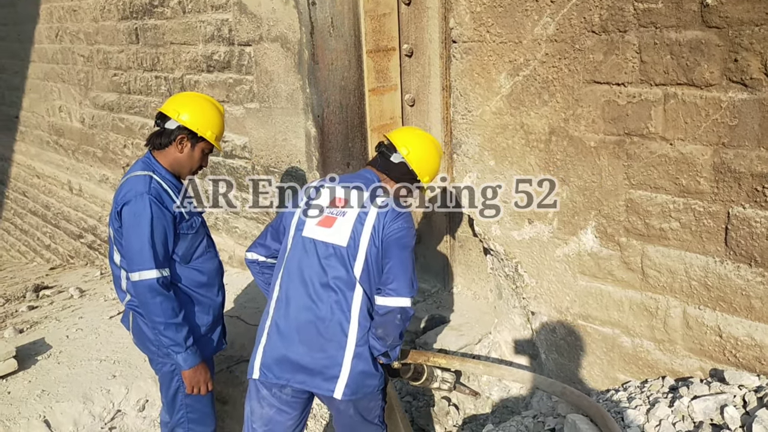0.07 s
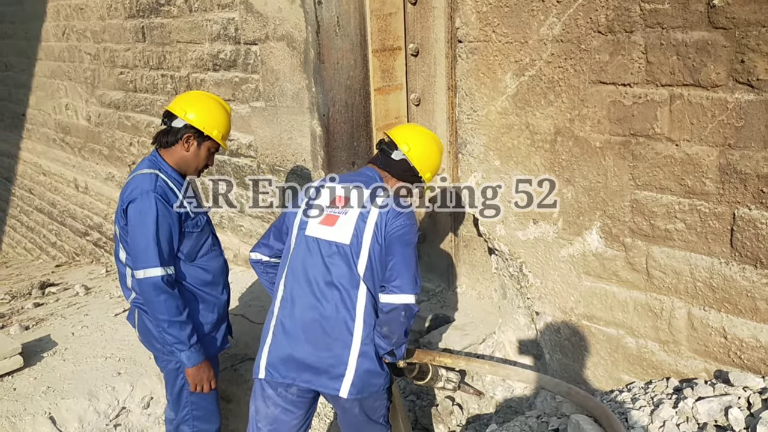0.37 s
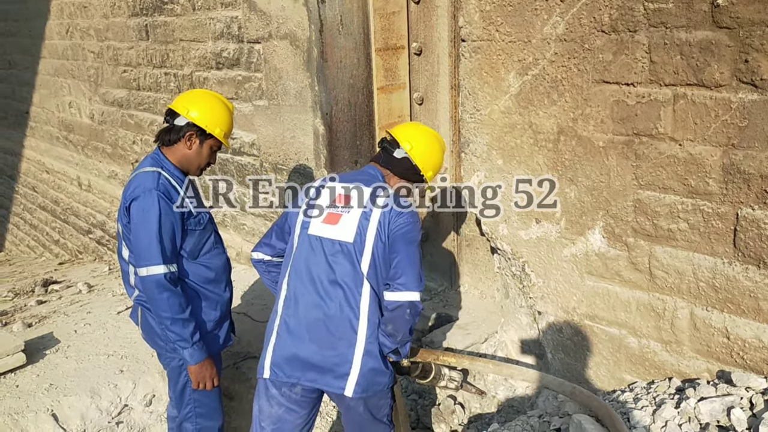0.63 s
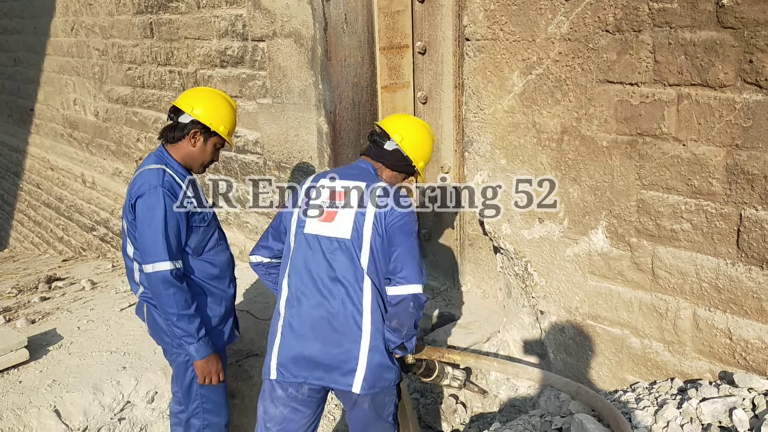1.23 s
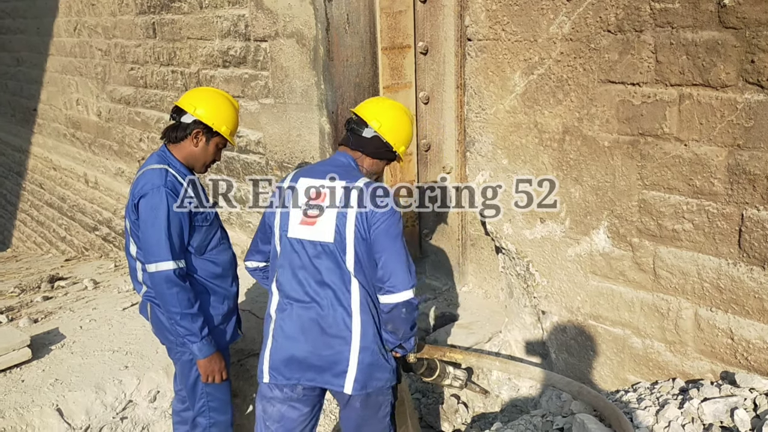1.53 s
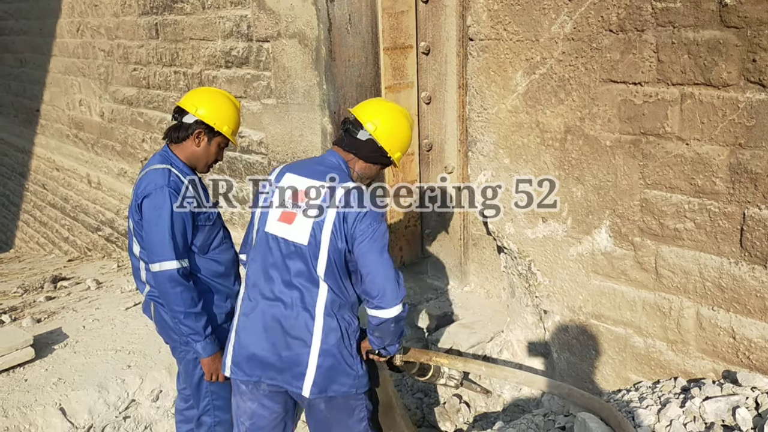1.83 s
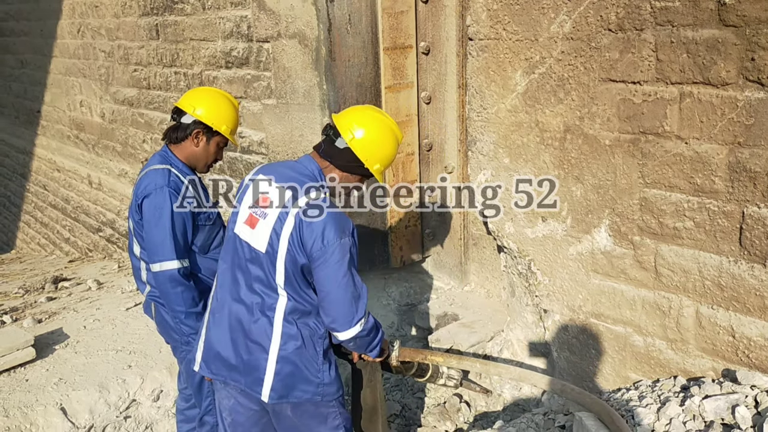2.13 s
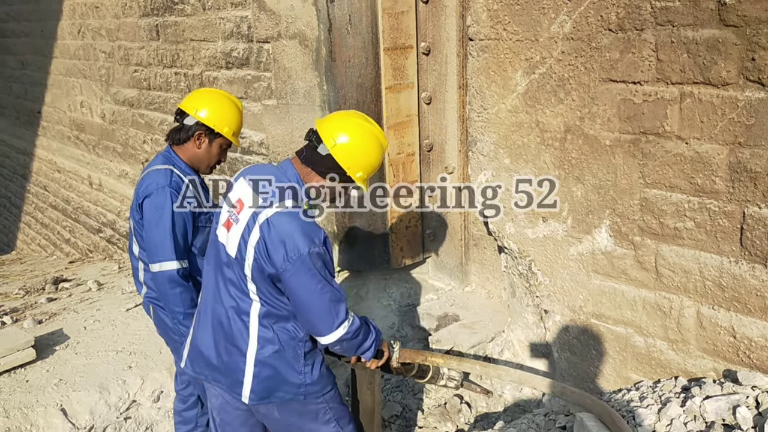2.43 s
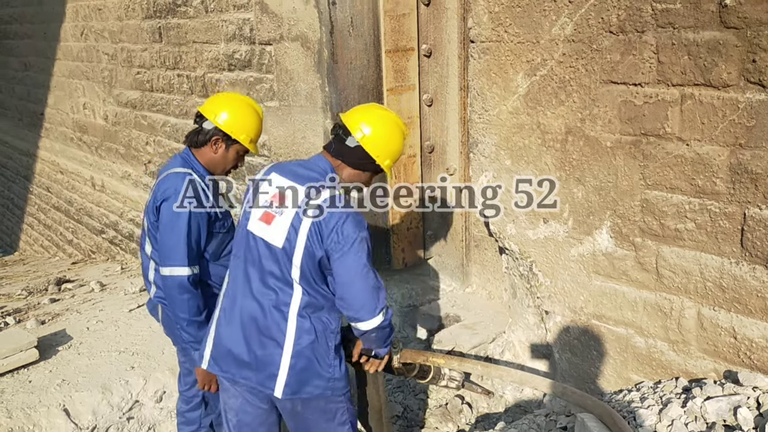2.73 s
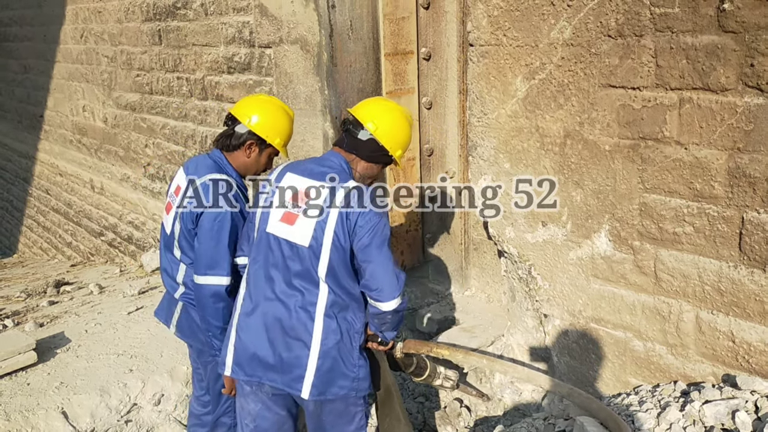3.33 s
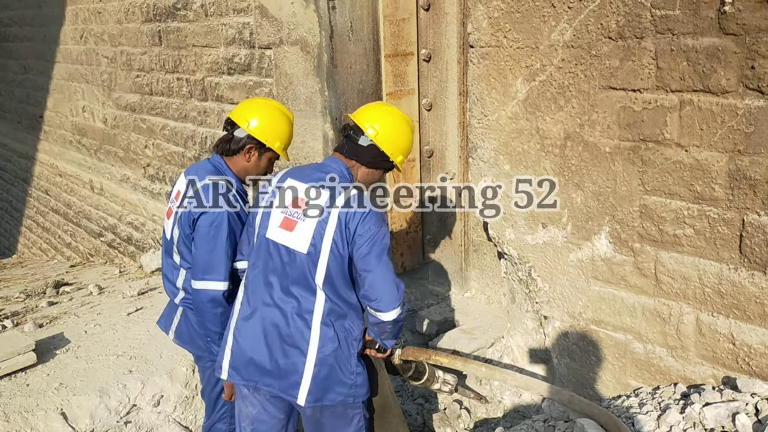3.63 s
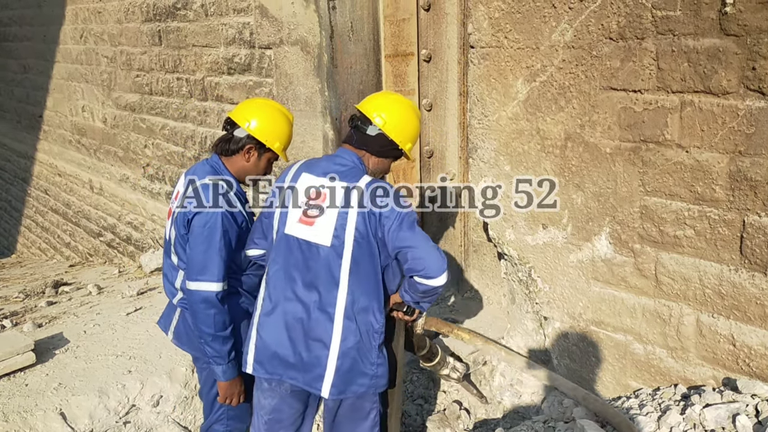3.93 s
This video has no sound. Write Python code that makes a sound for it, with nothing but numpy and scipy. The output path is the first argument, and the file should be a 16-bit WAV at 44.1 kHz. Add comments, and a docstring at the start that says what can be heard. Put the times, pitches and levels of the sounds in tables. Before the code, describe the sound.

A pneumatic hammer pounds concrete rapidly from the start until about 1.7 seconds, each stroke a steel tick, a knock and a puff of air. Compressed air then rushes steadily with a whirring rattle and low throb. At 2.9 seconds a short, faster burst of blows cuts in, and the air resumes from 3.3 seconds to the end. Faint leaking air and outdoor site noise run underneath.

```python
"""A pneumatic hammer pounds concrete outdoors, a few metres away in front of a stone wall.
Each stroke is a steel tick, a knock in the concrete and a puff of exhaust air.
After each of the two bursts the air rushes steadily, with a whirring machine rattle and a low throb.
Underneath run leaking air, site noise, slow gusts and faint, very low thumps from the recorder."""
import sys
import numpy as np
from scipy import signal
from scipy.fft import rfft, irfft
from scipy.io import wavfile
from scipy.ndimage import uniform_filter1d

SR = 44100
rng = np.random.default_rng(int(sys.argv[2]) if len(sys.argv) > 2 else 0)


def transcribe(signal):
    """Save signal, clipped to [-1, 1], as a 16-bit WAV file at the path in sys.argv[1]."""
    frames = np.atleast_2d(signal).T
    limited = np.clip(frames, -1, 1)
    pcm = np.round(limited * 32767).astype(np.int16)
    wavfile.write(sys.argv[1], SR, pcm)


N = 176400

# spells of rushing air: start_s, end_s, level_db, whirr_swell_s
AIR_SPELLS = [(1.729, 2.894, -41.5, 0.077), (3.33, 4.1, -41.5, .022)]


def undb(db):
    return 10 ** (np.asarray(db) / 20)


def unit_rms(x):
    return x / np.sqrt(np.mean(x ** 2))


def colour(x, spectrum):
    """Filter by points of freq_hz, gain_db; rms 1."""
    hz, db = np.array(spectrum, float).T
    bins_hz = np.maximum(np.arange(N // 2 + 1) * SR / N, 1)
    gain = undb(np.interp(np.log(bins_hz), np.log(hz), db))
    return unit_rms(irfft(rfft(x) * gain, N))


def noise(spectrum):
    return colour(rng.standard_normal(N), spectrum)


def drift(rate_hz):
    """Smooth random drift; rms 1."""
    step = int(SR / rate_hz)
    stairs = np.repeat(rng.standard_normal(N // step + 1), step)
    return unit_rms(uniform_filter1d(uniform_filter1d(stairs, step), step)[:N])


def pulses(starts_s, levels_db, rise_s, hold_s, decay_s):
    """Sum of rise-hold-decay envelopes."""
    t = np.arange(SR // 4) / SR
    shape = np.minimum(t / rise_s, 1) * np.exp(-np.maximum(t - rise_s - hold_s, 0) / decay_s)
    impulses = np.zeros(N)
    impulses[np.clip((starts_s * SR).astype(int), 0, N - 1)] = undb(levels_db)
    return signal.fftconvolve(impulses, shape)[:N]


def add(out, start_s, x):
    i = int(max(start_s, 0) * SR)
    out[i:i + len(x)] += x[:max(N - i, 0)]


def ring(modes, length_s, t60_scale=1):
    """Struck modes decay; every blow detunes them slightly."""
    t = np.arange(int(length_s * SR)) / SR
    return sum(undb(db) * np.sin(2 * np.pi * hz * (1 + 0.0021 * rng.standard_normal()) * t)
               * np.exp(-np.log(1000) * t / (t60_s * t60_scale)) for hz, db, t60_s in modes)


def hammer():
    """Air drives the piston onto steel, the tip knocks and cracks concrete, the cylinder exhausts."""
    # start_s, tick_db, knock_db, puff_db
    strokes = [(0.001, -44, -42.5, -42.6), (0.0586, -40, -40, -43.5), (0.1184, -37, -45.5, -43.4),
               (0.18, -40.5, -41.2, -43.5), (0.2414, -38.6, -41, -44), (0.3025, -38.3, -42, -41.5),
               (0.3638, -39.5, -44, -48), (0.4248, -41, -44, -48), (0.4838, -39.5, -43.5, -47),
               (0.5436, -40, -40.5, -45), (0.6019, -39, -42, -46), (0.6623, -40, -43.5, -44.5),
               (0.7214, -40.1, -43.5, -48), (0.7806, -39.5, -43, -41.5), (0.84, -37.5, -39.5, -42),
               (0.9003, -40, -41.5, -46.5), (0.9588, -42, -41.5, -44.5), (1.0179, -40, -46.5, -48),
               (1.0788, -40.2, -43, -51), (1.1364, -40, -41.5, -46), (1.1951, -36.5, -39, -41.2),
               (1.2533, -41, -39.5, -42), (1.3149, -37, -42, -40.5), (1.3732, -37.5, -41, -44),
               (1.4342, -37, -42.1, -42), (1.4963, -37.5, -41.5, -41), (1.5592, -39, -44.5, -70),
               (1.5976, -38, -43.5, -62), (1.653, -41.5, -40.5, -60), (1.776, -49, -39, -56),
               (2.902, -39, -43, -66), (2.9426, -39.5, -44, -45), (3.008, -36, -42.7, -64),
               (3.0431, -38.5, -46.5, -78), (3.0769, -37.5, -46, -67), (3.1132, -38, -47, -78),
               (3.1477, -39.4, -42.5, -66), (3.1846, -39.6, -43.5, -70), (3.2239, -40.5, -44, -67)]
    # noise spectra: freq_hz, gain_db
    tick_spectrum = [(500, -18), (2500, -4.5), (4300, -13), (6000, -13), (7200, -8.5), (9300, -10.5),
                     (11500, -1), (12900, -0.5), (15500, -0.5)]
    knock_spectrum = [(100, 16), (300, 1), (800, 3.5), (1400, 0.5), (2300, -5.5), (3500, -1), (4400, 0.5),
                      (6000, -14.5), (7200, -3.5), (9500, -12), (15000, -15)]
    thud_spectrum = [(30, -12), (60, 11), (110, -18), (160, 1.5), (230, -3), (320, 4), (430, -17),
                     (570, -2.5), (750, -31), (2000, -34)]
    puff_spectrum = [(150, 5), (600, 2.5), (900, -8), (4000, -2.5), (5800, -15.5), (7300, -4.5), (8800, -6),
                     (10300, -5), (12000, 2), (15500, -0.5)]
    # steel chisel: pitch_hz, gain_db, free_t60_s
    chisel_modes = [(4332, -4.5, 0.22), (4900, -22, .15), (6120, -14.5, 0.22), (8400, -30, .1),
                    (9100, -18, 0.13), (11800, -10, 0.046), (13000, -1, 0.098)]
    # hammer body and slab: pitch_hz, gain_db, t60_s
    body_modes = [(156.2, -2.5, 0.23), (178, -3.5, 0.15), (258.6, -2.5, 0.14), (317, -1.5, .12),
                  (566, -6.5, 0.16)]
    start_s, tick_db, knock_db, puff_db = np.array(strokes).T
    crack_s = start_s + 0.00401 + 0.00157 * rng.standard_normal(len(start_s))
    inlet = pulses(start_s - 0.0033, tick_db - 14, rise_s=0.0033, hold_s=0, decay_s=0.00092)
    tick = pulses(start_s - 0.0007, tick_db + 5, rise_s=0.0014, hold_s=0.0005, decay_s=0.0014)
    tick_tail = pulses(start_s + 0.0019, tick_db - 6.5, rise_s=0.002, hold_s=0.003, decay_s=0.0099)
    knock = pulses(start_s, knock_db - 1, rise_s=0.0039, hold_s=0.0028, decay_s=0.0058)
    crack = pulses(crack_s, knock_db + 2.5, rise_s=0.0003, hold_s=0, decay_s=0.0008)
    thud = pulses(start_s - 0.003, knock_db - 11.5, rise_s=0.0014, hold_s=0.0018, decay_s=0.022)
    puff = pulses(start_s + 0.017, puff_db + 1.5, rise_s=0.003, hold_s=0.0073, decay_s=0.0092)
    steel = noise(tick_spectrum) * (inlet + tick + tick_tail)
    concrete = noise(knock_spectrum) * (knock + crack) + noise(thud_spectrum) * thud
    exhaust = noise(puff_spectrum) * puff
    out = steel + concrete + exhaust
    for at_s, _, impact_db, exhaust_db in strokes:
        # full strokes (strong exhaust) ring the chisel most; pressing on concrete damps it
        add(out, at_s + 0.0018, undb(exhaust_db - 5.5) * ring(chisel_modes, 0.15, t60_scale=0.45))
        add(out, at_s - 0.002, undb(impact_db - 10) * ring(body_modes, 0.15))
    add(out, 2.951, undb(-44) * ring(chisel_modes, length_s=0.064))  # one free ring
    return out


def background():
    """Leaking air and site noise, with slow gusts and faint, very low thumps from the recorder."""
    # leak and site noise: freq_hz, gain_db
    site_spectrum = [(18, -30), (30, 6.5), (108, -7), (164, -1.5), (378, -11), (574, -10), (827, -22),
                     (1320, -11.5), (1720, -15), (4280, -18.5), (5560, -20), (7220, -16), (8900, -28.5),
                     (12500, -16), (15400, -19)]
    # its contour: time_s, level_db
    site_levels = [(0, -47.5), (1.5, -47), (1.7, -47.5), (2.86, -50.5), (2.93, -52), (3.0, -49),
                   (3.15, -49.5), (3.21, -56.5), (3.27, -47.5), (4, -48.5)]
    # start_s, level_db
    recorder_low_thumps = [(0.611, -39), (0.623, -41), (0.909, -37), (1.147, -39), (1.381, -40),
                           (2.951, -34.5), (3.043, -36), (3.151, -40), (3.184, -36), (3.223, -34)]
    gusts = unit_rms(signal.sosfilt(signal.butter(2, 9.8, fs=SR, output="sos"), rng.standard_normal(N)))
    level_db = np.interp(np.arange(N) / SR, *np.array(site_levels).T)
    site = undb(level_db + 0.81 * drift(rate_hz=5.6)) * noise(site_spectrum)
    thumps = pulses(*np.array(recorder_low_thumps).T, rise_s=0.0045, hold_s=0, decay_s=0.015)
    thumps = signal.sosfilt(signal.butter(1, 8, "high", fs=SR, output="sos"), thumps)
    return site + undb(-53.5) * gusts + thumps


def air_flow(rises_s, lag_s=0, shut_off_s=0.0062):
    """Flow gain: swells, holds and shuts off in each spell."""
    t = np.arange(N) / SR
    gain = np.zeros(N)
    for (start_s, end_s, level_db, _), rise_s in zip(AIR_SPELLS, rises_s):
        swell = np.exp(np.minimum(t - start_s - lag_s, 0) / rise_s)
        shut_off = np.exp(-np.maximum(t - end_s, 0) / shut_off_s)
        gain += undb(level_db) * swell * shut_off
    return gain


def machine_tones(tones, clock_s, flutter_db=3):
    """Fluttering sines locked to the machine's speed."""
    out = np.zeros(N)
    for pitch_hz, level_db in tones:
        rms = undb(level_db + flutter_db * (drift(rate_hz=9) - 0.82))
        out += rms * np.sqrt(2) * np.sin(2 * np.pi * (pitch_hz * clock_s + rng.random()))
    return out


def rushing_air():
    """Air hisses and beats over a rattle that repeats each machine cycle, a whirr and a low throb."""
    # freq_hz, gain_db
    air_spectrum = [(18, -38), (30, -33), (48, -21), (92, -7.5), (117, -13.5), (144, -10.5), (202, -11.5),
                    (315, -20), (358, -11.5), (442, -17.5), (517, -17.5), (559, -17), (604, -18.5),
                    (1070, -15.5), (1320, -7), (1720, -15.5), (2230, -14.5), (2750, -18), (3050, -28.5),
                    (3960, -23.5), (4630, -37), (6850, -19.5), (8670, -33), (12200, -18.5), (15400, -21)]
    # machine tones: pitch_hz, level_db
    whirr_tones = [(950.5, -64), (1153.5, -65.5), (1194, -70), (1233, -54), (1293, -58), (1332, -53.5),
                   (1371, -57.5), (1424, -59), (1449, -73), (1490, -72), (2031, -64), (2278, -74)]
    throb_tones = [(59, -49.5), (79, -57.5), (88.6, -49.5), (98.4, -54), (108.3, -55.5), (354.5, -62)]
    cycle_hz, beats_per_cycle, beat_depth, rattle_share = 9.84, 4, 0.084, 0.37
    clock_s = np.cumsum(1 + 0.0008 * drift(rate_hz=3)) / SR  # speed wanders
    cycle_phase = clock_s * cycle_hz % 1
    cycle_samples = int(SR / cycle_hz)
    rattle = rng.standard_normal(cycle_samples)[(cycle_phase * cycle_samples).astype(int)]
    rush = rng.standard_normal(N)
    air = colour(np.sqrt(rattle_share) * rattle + np.sqrt(1 - rattle_share) * rush, air_spectrum)
    low_air = signal.sosfiltfilt(signal.butter(2, 3000, fs=SR, output="sos"), air)
    hiss = (air - low_air) * air_flow(rises_s=[0.0042] * len(AIR_SPELLS))
    beat = 1 + beat_depth * np.cos(2 * np.pi * beats_per_cycle * cycle_phase)
    running = air_flow([swell_s for *_, swell_s in AIR_SPELLS], lag_s=0.013)
    hum = undb(-0.5) * machine_tones(whirr_tones, clock_s) + machine_tones(throb_tones, clock_s)
    return hiss + running * (low_air * beat + hum / running.max())


def wall_scatter(x, t60_s=0.19, gap_s=0.005):
    """The stone wall returns a short diffuse tail."""
    t = np.arange(SR // 3) / SR
    tail = rng.standard_normal(len(t)) * np.exp(-np.log(1000) * t / t60_s) * (t > gap_s)
    return signal.fftconvolve(x, tail / np.linalg.norm(tail))[:N]


def with_near_echoes(x, count=12, spread_s=0.0087, gain_db=-8):
    """Ground and wall add quick thin copies that ripple the spectrum."""
    delays_s = rng.uniform(0.05, 1, count) * spread_s
    gains = rng.choice([-1, 1], count) * undb(gain_db) / np.sqrt(count)
    thin = signal.sosfilt(signal.butter(1, 2000, "high", fs=SR, output="sos"), x)
    out = x.copy()
    for delay_s, gain in zip(delays_s, gains):
        add(out, delay_s, gain * thin)
    return out


def scene():
    """Hammer, air and their echoes over the background; both channels alike."""
    blows = hammer()
    wall = undb(-18) * wall_scatter(blows)
    mono = with_near_echoes(blows + rushing_air()) + wall + background()
    return np.array([mono, mono])


def record(dry):
    """Steep low-pass at 15550 Hz."""
    return signal.sosfilt(signal.ellip(12, 0.2, 70, 15550, fs=SR, output="sos"), dry)


dry = scene()
out = record(dry)
transcribe(out)
```